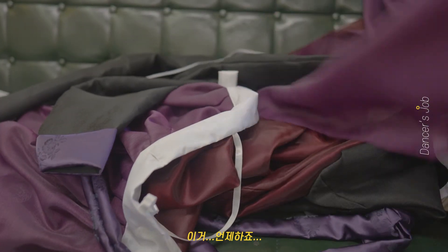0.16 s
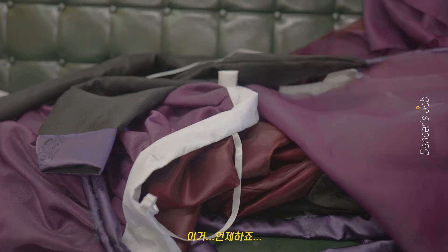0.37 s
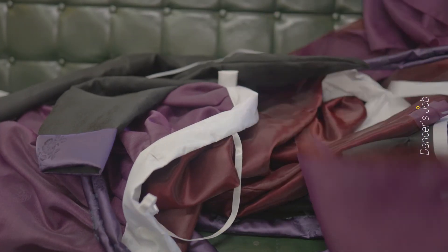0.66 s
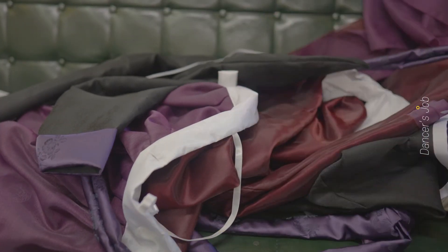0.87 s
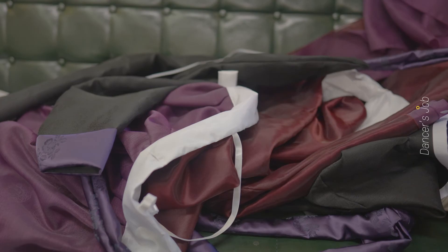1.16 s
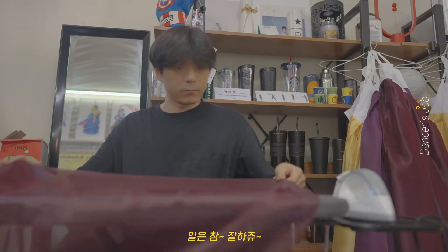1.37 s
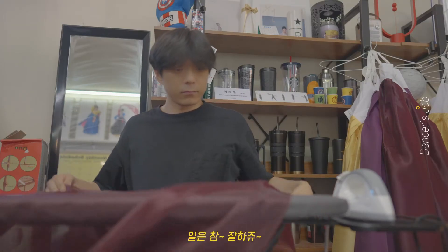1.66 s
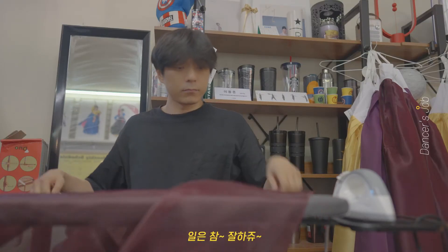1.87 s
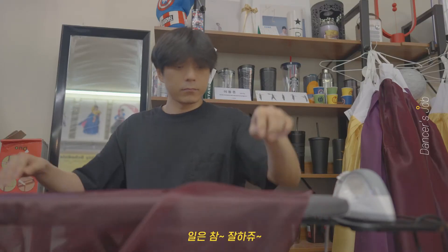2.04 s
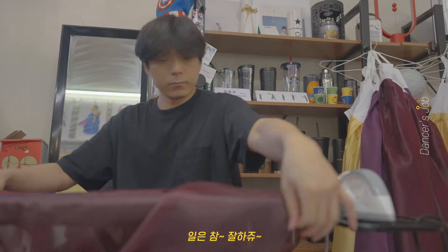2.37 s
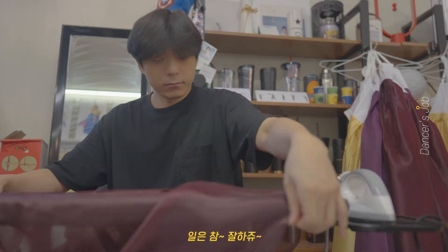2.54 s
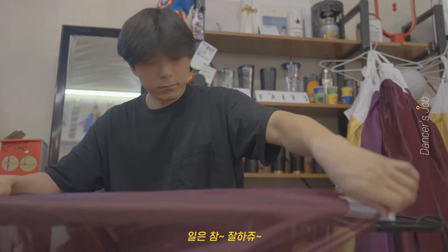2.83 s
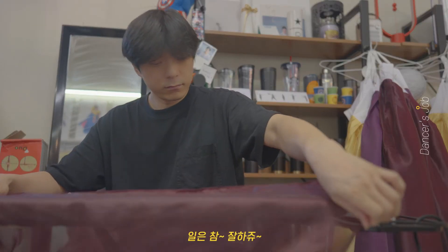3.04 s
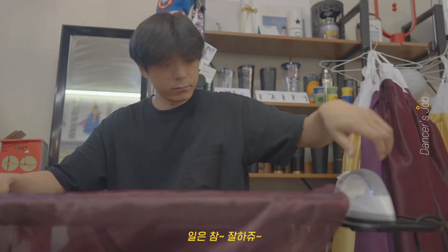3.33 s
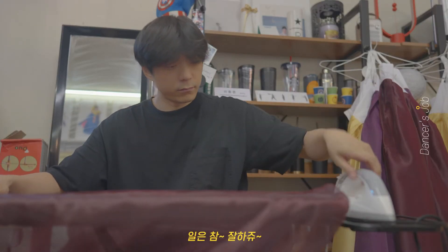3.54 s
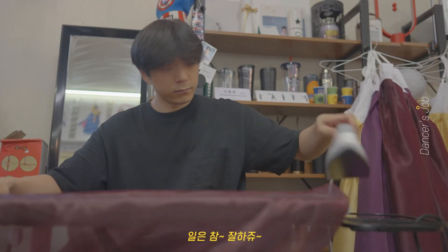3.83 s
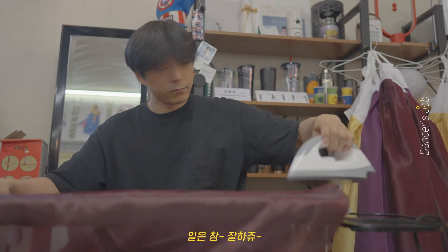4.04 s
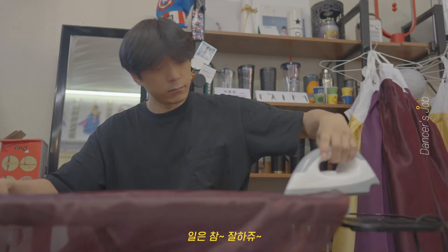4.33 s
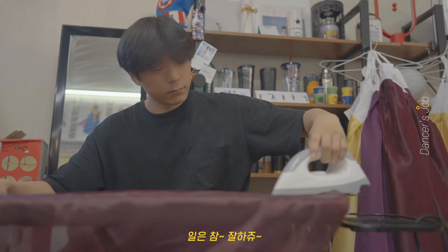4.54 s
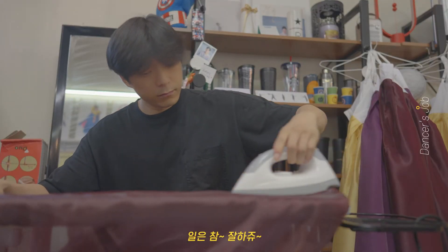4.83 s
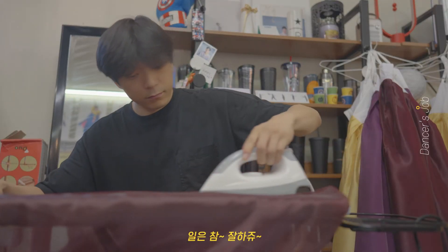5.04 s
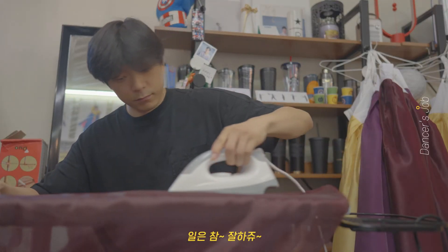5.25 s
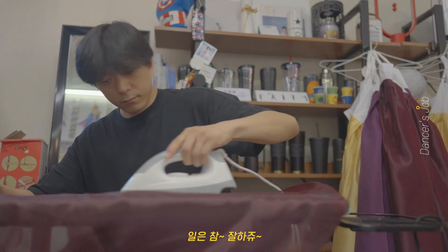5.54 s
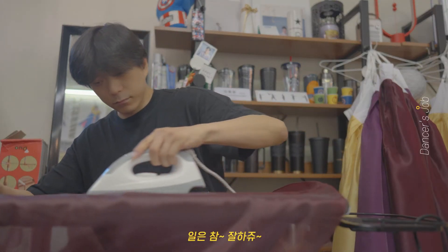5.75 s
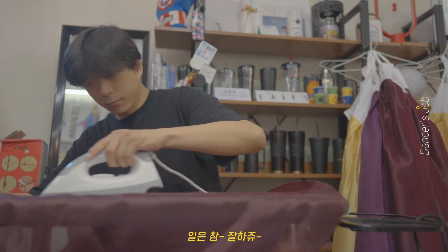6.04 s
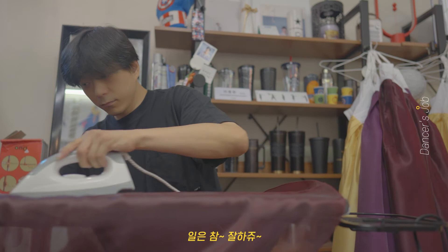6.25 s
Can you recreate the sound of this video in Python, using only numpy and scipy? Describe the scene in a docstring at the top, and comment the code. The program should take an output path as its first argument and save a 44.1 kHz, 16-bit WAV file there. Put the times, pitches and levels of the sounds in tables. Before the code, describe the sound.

Satin rustles and swishes off a pile and across a board, then an iron bumps down and slides with a soft hiss over a whining fan.

```python
"""Satin and a dry iron.

Satin is dragged off a heap of clothes, weave hissing, folds swishing and flopping.
An abrupt cut to a small workroom: satin is swept over an ironing board and smoothed by hand.
An iron is lifted from its rest, set down with clicks and bumps, and pushed along with a soft hiss.
A fan whines behind it all, its tones faint at the heap and steady at the board."""
import sys
import numpy as np
from scipy import signal
from scipy.fft import rfft, irfft
from scipy.io import wavfile
from scipy.ndimage import uniform_filter1d

SR = 44100
rng = np.random.default_rng(int(sys.argv[2]) if len(sys.argv) > 2 else 0)


def bounce(signal):
    """Save signal as a 16-bit WAV file at the path given by the first command-line argument."""
    frames = np.transpose(np.atleast_2d(signal))
    limited = np.clip(frames, -1, 1)
    pcm = np.round(limited * 32767).astype(np.int16)
    wavfile.write(sys.argv[1], SR, pcm)


N = 282240
TIME = np.arange(N) / SR
CUT_S = 1.233
SATIN_PATCHY_DB = 0.7

# Background spectra: freq_hz, density_db
FAN_AIR_SPECTRUM = [(15, -33), (28, -13), (42, -22.5), (65, -16.5), (95, -30.5), (150, -14.5), (270, -15),
                    (450, -12), (640, -7), (800, -5), (930, -6.5), (1080, -3), (1280, -3.5), (1450, -8),
                    (1750, -6), (2500, -9.5), (4000, -14), (9000, -23)]
TREBLE_SPECTRUM = [(2000, -14), (4000, -2), (6000, -5.5), (9700, -5), (12500, -2.5), (13600, 0.5),
                   (14300, 4.5), (15000, 0.5), (16000, 1)]
# Rubbing spectra: freq_hz, density_db
HEAP_WEAVE_SPECTRUM = [(2000, -50), (3800, -12), (5000, 0), (6500, 1), (8300, 2), (10000, 2), (12000, 0),
                       (16000, -0.5)]
HEAP_FOLD_SPECTRUM = [(100, -20), (350, -47), (700, -10), (1100, -3), (1800, 3), (2800, 3.5), (4000, -0.5),
                      (6000, -3), (10000, -25)]
BOARD_WEAVE_SPECTRUM = [(2000, -64), (3800, -6), (5000, -2), (6300, -0.5), (8000, 1.5), (10500, 0.5),
                        (12500, -2.5), (16000, -1.5)]
BOARD_FOLD_SPECTRUM = [(150, -48), (450, -27), (800, -11), (1300, -0.5), (2100, 1), (2900, 5), (3800, -2.5),
                       (6000, -8), (10000, -37)]
PALM_FOLD_SPECTRUM = [(200, -37), (500, -9.5), (900, -9), (1300, -1.5), (2050, -1), (3000, -1),
                      (4200, -3.5), (6000, -3.5), (10000, -27)]
HEEL_SPECTRUM = [(200, -34), (380, -9), (560, 0.5), (900, -8), (1800, -1), (2900, -2), (4000, -3),
                 (7000, -12.5)]
SOLE_HISS_SPECTRUM = [(2000, -33), (3800, -3.5), (5300, 1.5), (7000, -2), (10000, -5), (13000, -9),
                      (16000, -21)]
SOLE_RUB_SPECTRUM = [(300, -44), (700, -21), (1150, -0.5), (1900, -2), (2900, 2.5), (4200, -3), (7000, -20)]
# Left-right likeness, near and diffuse sound: freq_hz, coherence
NEAR_FIELD = [(100, 0.64), (600, 1), (1400, 0.94), (3300, 0.53), (5500, 0.19), (16000, 0.28)]
DIFFUSE_FIELD = [(100, 1), (300, 0.96), (700, 0.82), (1300, 0.34), (2500, 0.42), (4000, 0.6), (6000, 0.12),
                 (16000, 0.1)]
# Resonances of fan housing and iron heel: centre_hz, width_hz, boost_db
HOUSING_PEAKS = [(407, 40, 2.5), (484, 14, 0.5), (693, 25, 3), (976, 70, 3.5), (1060, 75, 2), (1180, 82, 2),
                 (1233, 31, -4), (1259, 59, 4), (1397, 34, 1.5), (1526, 57, 2)]
HEEL_PEAKS = [(4330, 110, 8), (6560, 300, 8), (7950, 350, 11)]
# Motor and blade tones: pitch_hz, level_db, stereo_phase_rad
FAN_TONES = [(28.1, -74, 0), (120, -76, 0), (170.8, -67, 0), (703.2, -63, 0.14), (761.7, -63, 0.3),
             (820.3, -61.5, 0.47), (878.8, -64, 0.73), (1035.6, -49.2, 0.89), (1054.5, -62, 0.9),
             (1155.4, -52.5, 1), (1171.5, -60, 1), (1353.2, -56.5, 0.91), (1464.9, -63.5, 1),
             (2573, -65, 0.15)]
# Modes of wire rest, plastic iron shell, padded board: freq_hz, level_db, t60_s
REST_MODES = [(1644, -3, 0.004), (2350, -6, 0.0034), (3000, 2, 0.003), (4800, 0, 0.0035), (5200, 2, 0.003),
              (5600, -4, 0.0046)]
SHELL_MODES = [(1900, -4, 0.0012), (2870, 3.5, 0.003), (4800, -0.5, 0.00085), (7500, -5, 0.0013),
               (9900, -14, 0.001), (12600, 0, 0.0018), (13500, -2, 0.0027)]
BOARD_MODES = [(72, -19, 0.15), (164, -11, 0.097), (388, -7, 0.07), (587, -1.5, 0.026), (690, -17, .05),
               (809, 2, 0.07), (890, -2, 0.058), (1084, -3, 0.025), (1490, -4, 0.02), (2220, -3.5, 0.0067)]
# Blows on each (pan is left minus right): start_s, peak_db, contact_s, pan_db
REST_BLOWS = [(2.6412, -18.5, 0.0018, -2), (2.6452, -26.5, 0.0025, 0), (2.653, -28, 0.0079, 6),
              (2.675, -35, .005, 3)]
SHELL_BLOWS = [(2.355, -36, .002, -11), (3.71, -33, 0.0011, -10), (3.943, -34, .002, 0),
               (4.133, -25.5, 0.0054, -6)]
BOARD_BLOWS = [(3.85, -40, 0.013, 0), (3.943, -30.5, 0.012, 0), (4.196, -28, 0.009, -2),
               (4.209, -28.5, 0.009, 1)]
# Falling folds: start_s, puff_db, flick_db, decay_s
FOLD_FLOPS = [(0.311, -45.5, -37, 0.064), (0.549, -39.5, -30, 0.049), (.67, -63, -26, 0.091),
              (0.819, -44.5, -42.5, 0.024), (1.24, -42.5, -55, 0.073)]
# Strokes of cloth, hand and iron: start_s, rise_s, hold_s, fall_s, hiss_db, swish_db, pan_db
HEAP_PULLS = [(-.05, 0.016, 0.038, 0.17, -36, -40, -1), (0.05, 0.1, 0.079, 0.083, -46.5, -45.5, 2),
              (.255, 0.13, 0.33, 0.19, -34, -42, -3.5), (.44, 0.22, .005, 0.35, -33, -38, -1),
              (.74, 0.24, 0.079, .16, -26, -36, -1.5), (.935, 0.12, 0.065, 0.21, -26, -38.5, -8),
              (1.04, 0.11, 0.09, 0.098, -27, -53, 4)]
BOARD_SWEEPS = [(1.222, 0.14, 0.018, 0.19, -22, -34, 4), (1.38, 0.18, 0.024, 0.2, -22.3, -33.5, 2),
                (1.56, 0.1, 0.045, 0.065, -39, -35.5, -1), (1.7, .2, 0.053, 0.14, -39, -42.5, 1),
                (2.08, 0.47, .02, .2, -51, -62, 2)]
HAND_STROKES = [(2.62, 0.035, 0.35, 0.39, -46, -49, 2), (2.7, 0.12, 0.024, 0.09, -31, -33.5, 2.5),
                (3.04, 0.014, .008, 0.071, -37, -47, 1)]
HEEL_SCUFFS = [(3.735, 0.041, 0.018, 0.052, -43, -43.5, -.5), (3.812, 0.037, 0.016, 0.05, -50, -36.5, -1),
               (3.85, 0.04, 0.03, 0.075, -44, -41, -1), (4.131, 0.006, 0.026, 0.025, -44.5, -50, -4),
               (4.175, 0.04, 0.008, 0.032, -58, -43, -1)]
SOLE_PUSHES = [(4.45, 0.35, 0.11, 0.34, -46, -46, 0), (4.95, 0.29, 0.39, 0.46, -44.5, -45.5, 1.5),
               (5.72, 0.35, 0.13, .45, -45, -45.5, 1.5)]
# Passing rate of the satin's ribs: time_s, rate_hz
SWEEP_RIB_RATE = [(1.3, 2000), (1.35, 2200), (1.39, 2720), (1.42, 3000), (1.49, 2950), (1.55, 2650),
                  (1.61, 2570), (1.68, 2950)]
PALM_RIB_RATE = [(2.73, 2400), (2.775, 2500), (2.8, 2220), (2.84, 1980), (2.89, 1700)]
SOLE_RIB_RATE = [(4.6, 1600), (5.0, 1750), (5.4, 2620), (5.75, 1500), (5.98, 1750), (6.12, 2300),
                 (6.35, 2530)]
# Reflections off shelves and walls: left_ms, right_ms, gain
REFLECTIONS = [(3.9, 3.3, -0.045), (6.1, 7.9, 0.12), (9.4, 8.8, 0.15), (13.3, 19, -0.1)]
# Room decay: freq_hz, t60_s
ROOM_DECAY = [(100, 0.27), (1000, 0.3), (5000, 0.3), (16000, 0.15)]
# Microphone mismatch: freq_hz, pan_db
MIC_BALANCE = [(200, -1.5), (1200, 0.2), (4000, -1), (6000, -2.5), (8500, -4), (11000, -2.5), (14000, 1.5)]


def amp(db):
    """Decibels to gain."""
    return 10 ** (np.asarray(db) / 20)


def unit_rms(x):
    """Scale to rms 1."""
    return x / np.sqrt(np.mean(x ** 2) + 1e-20)


def curve(points, hz):
    """Interpolate a table over log frequency."""
    freq_hz, value = np.transpose(points)
    return np.interp(np.log(hz + 1), np.log(freq_hz + 1), value)


def pan(db):
    """Stereo gains for a left-minus-right level."""
    half_db = np.atleast_1d(db) / 2
    return amp([half_db, -half_db])


def drift(rate_hz):
    """Slow random wander, rms 1."""
    return unit_rms(np.interp(TIME * rate_hz, np.arange(400), rng.standard_normal(400)))


def resonances(hz, peaks):
    """Flat gain plus resonant peaks."""
    return np.sqrt(1 + sum(amp(db) ** 2 / (1 + (2 * (hz - centre_hz) / width_hz) ** 2) ** 2
                           for centre_hz, width_hz, db in peaks))


def noise(spectrum, field, lag_ms=0, patchy_db=0, flicker_db=0, peaks=None, size=512):
    """Stereo noise with drifting patches, wide-band flicker and optional resonances peaks(t)."""
    hop = size // 4
    t, hz = np.arange(N // hop + 2) * hop / SR, np.fft.rfftfreq(size, 1 / SR)
    a, b, c, d, patches = rng.standard_normal((5, len(t), len(hz)))
    patches = unit_rms(uniform_filter1d(uniform_filter1d(patches, size=12, axis=0), size=9, axis=1))
    flicker = unit_rms(uniform_filter1d(rng.standard_normal((len(t), 1)), size=2, axis=0))
    coherence = np.clip(curve(field, hz), 0, 1)
    left = a + 1j * b
    right = coherence * left + np.sqrt(1 - coherence ** 2) * (c + 1j * d)
    right *= np.exp(-2j * np.pi * hz * lag_ms / 1000)
    gain = amp(curve(spectrum, hz) + patchy_db * patches + flicker_db * flicker)
    if peaks is not None:
        gain *= resonances(hz, peaks(t[:, None]))
    frames = np.array([left, right]) * gain
    x = signal.istft(frames, nperseg=size, noverlap=size - hop, time_axis=1, freq_axis=2)[1][:, :N]
    return x / np.std(x.mean(0))


def reflected(x):
    """Direct sound plus early reflections: fine spectral ripple."""
    out = x.copy()
    for *delays_ms, gain in REFLECTIONS:
        for side, ms in enumerate(delays_ms):
            out[side] += gain * np.interp(TIME - ms / 1000, TIME, x[side], left=0)
    return out / np.sqrt(1 + sum(gain ** 2 for *_, gain in REFLECTIONS))


def room_tail(x):
    """Diffuse tail of a small, cluttered room; treble dies first."""
    hz, t, frames = signal.stft(rng.standard_normal((2, SR // 2)), SR, nperseg=256)
    decay = amp(-60 * t / curve(ROOM_DECAY, hz)[:, None])
    tail = signal.istft(frames * decay * np.minimum(t / 0.0039, 1), SR, nperseg=256)[1]
    return signal.fftconvolve(x, tail / np.linalg.norm(tail[0]), axes=1)[:, :N]


def fan_air():
    """Air through the fan's ringing housing, plus fine treble hiss; both to the left."""
    air = noise(FAN_AIR_SPECTRUM, DIFFUSE_FIELD, lag_ms=0.11, patchy_db=1,
                peaks=lambda t: HOUSING_PEAKS, size=4096)
    hiss = noise(TREBLE_SPECTRUM, DIFFUSE_FIELD, lag_ms=0.12, patchy_db=1.5, size=1024)
    return amp(-42.5) * air * pan(2.8) + amp(-43) * hiss * pan(4.5)


def fan_whine(waver_rad=0.4, flutter_db=1.1):
    """Motor hum and blade tones, wavering in pitch and level."""
    out = np.zeros((2, N))
    for hz, db, stereo_rad in FAN_TONES:
        phase = 2 * np.pi * hz * TIME + waver_rad * drift(5)
        out += np.sqrt(2) * amp(db + flutter_db * drift(9)) * np.sin([phase, phase + stereo_rad])
    return out * pan(7.2)


def knocks(blows, modes):
    """Short, rough contacts ring an object's modes."""
    t, out = np.arange(SR // 4) / SR, np.zeros((2, N))
    for start_s, peak_db, contact_s, pan_db in blows:
        roughness = rng.standard_normal(len(t)) + 0.45 * rng.standard_normal((2, len(t)))
        force = roughness * np.exp(-t / contact_s)
        knock = 0
        for hz, mode_db, t60_s in modes:
            ring = t * np.sin(2 * np.pi * hz * t) * amp(-60 * t / t60_s)  # builds, then dies
            knock += amp(mode_db) * unit_rms(signal.fftconvolve(force, ring[None], axes=1)[:, :len(t)])
        start = round(start_s * SR)
        out[:, start:start + len(t)] += amp(peak_db) * pan(pan_db) * knock / abs(knock).max()
    return out


def flops(attack_s=0.0038):
    """Each falling fold puffs air and flicks the cloth below."""
    puff = noise([(30, -12), (170, -4), (350, -4), (700, 6), (2000, -12.5)], DIFFUSE_FIELD)
    flick = noise(HEAP_WEAVE_SPECTRUM, NEAR_FIELD, lag_ms=-0.12)
    out = np.zeros((2, N))
    for start_s, puff_db, flick_db, decay_s in FOLD_FLOPS:
        age_s = np.maximum(TIME - start_s, 0)
        envelope = np.minimum(age_s / attack_s, 1) * np.exp(-age_s / decay_s)
        out += (amp(puff_db) * puff + amp(flick_db) * flick) * envelope
    return out


def snags(per_s, spread_db, decay_s=0.00033, shapes=6):
    """Threads catch and release: dense bright ticks, rms 1."""
    ticks = (rng.random(N) < per_s / SR) * amp(spread_db * np.minimum(rng.exponential(1, N), 2))
    t, out = np.arange(200) / SR, 0
    high_pass = signal.butter(2, 4500, "high", fs=SR, output="sos")
    shape_index = rng.integers(0, shapes, N)
    for k in range(shapes):
        shape = signal.sosfilt(high_pass, rng.standard_normal((2, 200)) * np.exp(-t / decay_s))
        out += signal.oaconvolve((ticks * (shape_index == k))[None], shape, axes=1)[:, :N]
    return unit_rms(out)


def zing(ribs, harmonics_db, width_hz=360, fade_db_per_s=90):
    """Passing ribs give gliding peaks at multiples of their rate, fading after the stroke."""
    time_s, rate_hz = np.transpose(ribs)

    def peaks(t):
        pitch_hz = np.interp(t, time_s, rate_hz)
        fade_db = fade_db_per_s * np.maximum(t - time_s[-1], 0)
        return [(k * pitch_hz, width_hz * np.sqrt(k), db - fade_db)
                for k, db in enumerate(harmonics_db, 1)]
    return peaks


def rub(strokes, hiss, swish, surge_db=0.55):
    """Strokes ease in, hold, ease out and add in power; hiss grows faster with speed than swish."""
    hiss_power = swish_power = 0
    for start_s, rise_s, hold_s, fall_s, hiss_db, swish_db, pan_db in strokes:
        age_s = TIME - start_s
        ramp = np.minimum(age_s / rise_s, 1 - (age_s - rise_s - hold_s) / fall_s)
        speed = np.sin(np.pi / 2 * np.clip(ramp, 0, 1)) ** 2
        hiss_power += (amp(hiss_db) * speed ** 0.7 * pan(pan_db)) ** 2
        swish_power += (amp(swish_db) * speed ** 0.58 * pan(pan_db / 2)) ** 2
    stick_slip = amp(surge_db * drift(30))
    return (np.sqrt(hiss_power) * hiss + np.sqrt(swish_power) * swish) * stick_slip


def iron():
    """The heel scuffs off its rest and onto the cloth; the soleplate hisses over the ribs."""
    scuff = noise(BOARD_WEAVE_SPECTRUM, DIFFUSE_FIELD, patchy_db=SATIN_PATCHY_DB, flicker_db=1.3)
    scrape = noise(HEEL_SPECTRUM, NEAR_FIELD, patchy_db=2.5, flicker_db=1.5, peaks=lambda t: HEEL_PEAKS)
    hiss = noise(SOLE_HISS_SPECTRUM, DIFFUSE_FIELD, patchy_db=1, flicker_db=0.4)
    swish = noise(SOLE_RUB_SPECTRUM, NEAR_FIELD, lag_ms=0.069, patchy_db=0.7, flicker_db=0.9,
                  peaks=zing(SOLE_RIB_RATE, harmonics_db=[1], width_hz=710))
    return rub(HEEL_SCUFFS, scuff, scrape) + rub(SOLE_PUSHES, hiss, swish)


def satin_off_heap():
    """Satin slides on satin, close and to the right, pushing a draught at the microphones."""
    weave = noise(HEAP_WEAVE_SPECTRUM, NEAR_FIELD, lag_ms=-0.138, patchy_db=SATIN_PATCHY_DB,
                  flicker_db=0.6)
    weave += amp(-7) * snags(per_s=2200, spread_db=4)
    folds = noise(HEAP_FOLD_SPECTRUM, NEAR_FIELD, lag_ms=-0.14, patchy_db=SATIN_PATCHY_DB)
    draught = noise([(15, -6), (28, 0), (60, -5), (110, -28), (210, 2), (400, -10), (900, -23)],
                    DIFFUSE_FIELD, patchy_db=4, size=2048)
    swell = np.exp(-((TIME - 0.6) / 0.47) ** 2)
    return rub(HEAP_PULLS, weave, folds) + amp(-57.5) * draught * swell


def satin_on_board():
    """Satin swept over the board, then smoothed by hand; its ribs zing."""
    sweep_zing = zing(SWEEP_RIB_RATE, harmonics_db=[-0.5, 1, -5, -2])
    threads = amp(-2) * snags(per_s=1800, spread_db=3.8)
    weave = noise(BOARD_WEAVE_SPECTRUM, NEAR_FIELD, lag_ms=0.0027, patchy_db=-0.1, flicker_db=0.5,
                  peaks=sweep_zing)
    folds = noise(BOARD_FOLD_SPECTRUM, NEAR_FIELD, lag_ms=0.044, patchy_db=SATIN_PATCHY_DB,
                  peaks=sweep_zing)
    pressed = noise(BOARD_WEAVE_SPECTRUM, NEAR_FIELD, patchy_db=0.5, flicker_db=1.7)
    palm = noise(PALM_FOLD_SPECTRUM, NEAR_FIELD, lag_ms=0.054, patchy_db=SATIN_PATCHY_DB,
                 flicker_db=1.5, peaks=zing(PALM_RIB_RATE, harmonics_db=[5]))
    return rub(BOARD_SWEEPS, weave + threads, folds) + rub(HAND_STROKES, pressed + threads, palm)


def scene(far_whine_db=-12, whine_rise_s=0.45):
    """Heap, then a hard cut to the board, where the whine swells in."""
    air = fan_air()
    whine = fan_whine() * amp(far_whine_db * np.clip(1 - (TIME - CUT_S) / whine_rise_s, 0, 1))
    at_heap = reflected(satin_off_heap() + air[::-1])  # air mirrored to the right
    hits = knocks(REST_BLOWS, REST_MODES) + knocks(SHELL_BLOWS, SHELL_MODES)
    hits += knocks(BOARD_BLOWS, BOARD_MODES)
    at_board = reflected(satin_on_board() + iron() + hits + air) + amp(-4) * room_tail(hits)
    return np.where(TIME < CUT_S, at_heap, at_board) + flops() + whine


def record(dry):
    """Close microphone pair: shared bass, slightly unlike treble, steep band limit."""
    mono_below_hz, cutoff_hz = 300, 15850
    hz = np.fft.rfftfreq(N, 1 / SR)
    left, right = rfft(dry) * pan(curve(MIC_BALANCE, hz))
    mid = (left + right) / 2
    side = (left - right) / 2 * hz / np.hypot(hz, mono_below_hz)
    pair = irfft(np.array([mid + side, mid - side]), N)
    low_pass = signal.firwin(1023, cutoff_hz, window=("kaiser", 9), fs=SR)
    return signal.oaconvolve(pair, low_pass[None], "same")


dry = scene()
out = record(dry)
bounce(out)
```